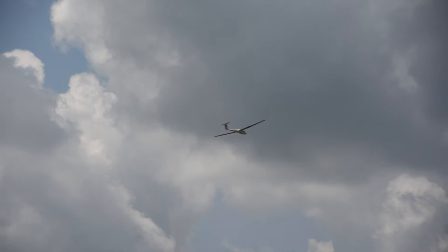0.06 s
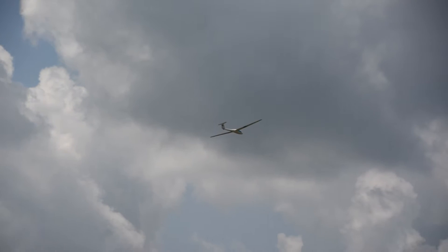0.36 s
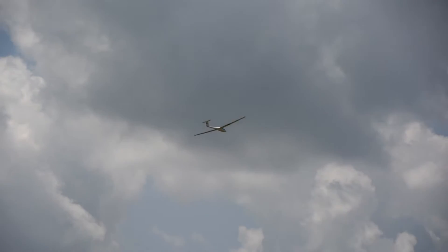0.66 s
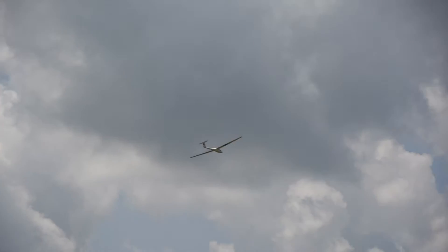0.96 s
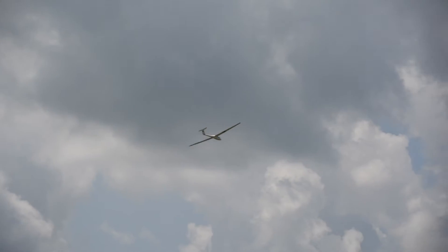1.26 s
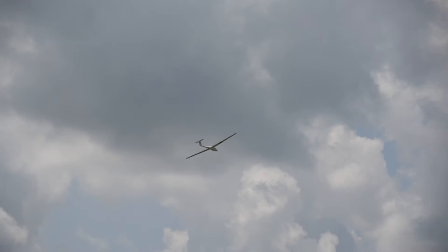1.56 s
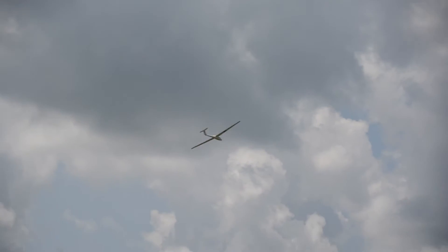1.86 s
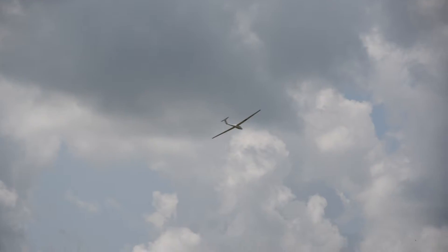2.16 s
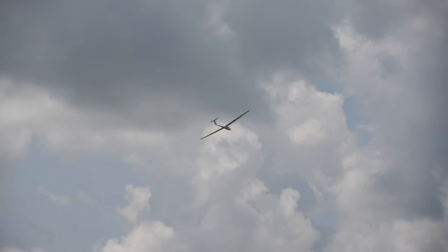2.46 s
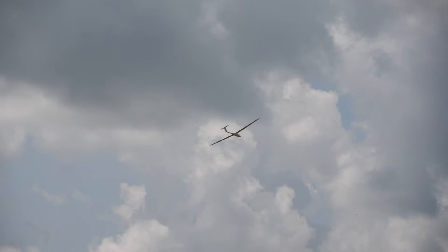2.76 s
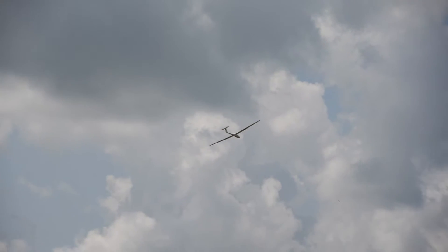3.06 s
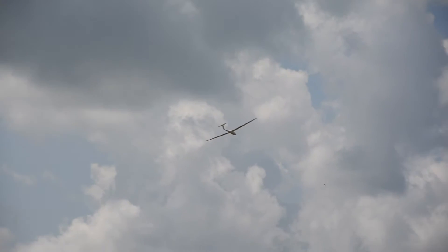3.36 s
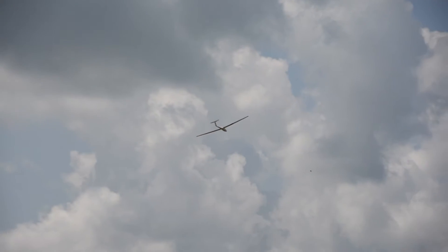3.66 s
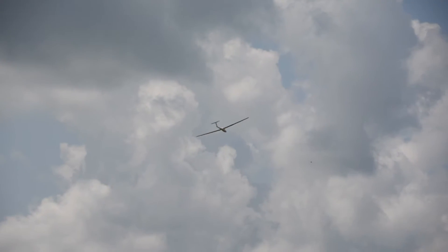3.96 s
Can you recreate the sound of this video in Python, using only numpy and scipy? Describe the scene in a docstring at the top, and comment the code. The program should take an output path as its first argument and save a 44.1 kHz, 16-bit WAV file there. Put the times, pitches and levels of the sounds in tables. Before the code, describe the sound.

Wind buffets the microphone outdoors for the whole four seconds, a low, fluttering rumble that surges and dips unevenly between left and right. Short bumps come throughout, with the hardest ones crackling at about 1.2, 1.5, 1.8 and 3.8 seconds, mostly on the left. Far behind lies a faint airy hiss, with a few barely audible thin chirps in the first second and a half.

```python
"""Gusty wind buffeting the two ports of a camera microphone, out under an open sky.
Each port has its own turbulence, right at the capsule: a steady rumble, and eddies that grow
harder and brighter in the gusts. The hardest buffets overload the recorder and crackle.
A faint airy hiss and a few thin chirps lie far behind."""
import sys
import numpy as np
from scipy import signal
from scipy.io import wavfile
from scipy.ndimage import uniform_filter1d

SR = 44100
rng = np.random.default_rng(int(sys.argv[2]) if len(sys.argv) > 2 else 0)


def master_out(mix):
    """Clip the mix to full scale and print it as 16-bit PCM to the path in sys.argv[1]."""
    frames = np.transpose(np.atleast_2d(mix))
    ceiling = np.clip(frames, -1, 1)
    pcm = np.round(ceiling * 32767).astype(np.int16)
    wavfile.write(sys.argv[1], SR, pcm)


N = 176400
PATCHY_PER_S = 8.2   # how fast each noise band wanders in level


def from_db(db):
    """Decibels to gain."""
    return 10 ** (np.asarray(db) / 20)


def rms_one(x):
    """Scale to unit power."""
    return x / np.sqrt(np.mean(x ** 2) + 1e-20)


def in_time(rows):
    """Read rows of time_s, value at every sample."""
    return np.interp(np.arange(N) / SR, *np.transpose(rows))


def at_hz(points, hz):
    """Read a table on a log-frequency axis."""
    freqs, values = np.transpose(points)
    return np.interp(np.log(hz), np.log(freqs), values)


def drift(per_s):
    """Smooth random motion with a spread of 1."""
    pole = np.exp(-40 * np.pi * per_s / SR)
    slow = signal.lfilter([1], [1, -2 * pole, pole * pole], rng.standard_normal(N // 20 + 4002))[4000:]
    return np.interp(np.arange(N) / 20, np.arange(len(slow)), rms_one(slow))


def band_noise(low, high):
    """Steep-sided band of noise with unit power, wide enough to meet its neighbours."""
    skirt = (high - low) / 8
    sos = signal.butter(2, [low - skirt, high + skirt], "band", fs=SR, output="sos")
    white = rng.standard_normal(N + SR // 4)
    return rms_one(signal.sosfilt(sos, signal.sosfilt(sos, white))[-N:])


def bands(spectrum, edges):
    """Share unit power by a spectrum: rows of low_hz, high_hz, centre_hz, gain."""
    hz = np.sqrt(edges[:-1] * edges[1:])
    gain = from_db(at_hz(spectrum, hz)) * np.sqrt(np.diff(edges))
    return zip(edges[:-1], edges[1:], hz, gain / np.linalg.norm(gain))


def chirps(wobble_hz=12):
    """Short, thin, slightly unsteady notes far behind the wind."""
    # faint whistles and chirps: centre_s, half_length_s, pitch_hz, level_db
    notes = [(.21, .025, 1846, -46), (.63, .16, 1460, -48), (.6, .035, 5841, -52.5),
             (.635, .03, 6681, -53.5), (1.28, .035, 9400, -61)]
    t = np.arange(N) / SR
    out = 0
    for centre_s, half_s, hz, db in notes:
        phase = 2 * np.pi * np.cumsum(hz + wobble_hz * drift(per_s=12)) / SR
        out += from_db(db) * np.exp(-((t - centre_s) / half_s) ** 2) * np.sin(phase)
    return out


def hiss(level_db=-41.5, patchy_db=1.3, flicker_db=1.2):
    """Airy, flickering background with a few narrow bands; it reaches the left port a sample later."""
    # colour of the hiss: freq_hz, density_db
    spectrum = [(1000, 11.5), (1900, 7.5), (2400, 3.5), (3600, -1.5), (4300, -4.5), (6700, -6.5),
                (10000, -12), (12500, -21), (15500, -37)]
    # how alike the two ports hear it: freq_hz, correlation
    likeness = [(1000, 0.28), (2500, 1), (4500, 0.8), (7000, 0.9), (11000, 0.21), (15000, .2)]
    # faint singing bands: centre_hz, width_hz, level_db
    narrow_bands = [(1454, 110, -49.5), (1914, 224, -47.5), (6640, 270, -69.5)]
    # slow rise and fall of the hiss: time_s, level_db
    swell = [(0, -3), (.28, -2.2), (.44, 3), (.54, -1.5), (.7, -0.8), (.94, -2.5), (1.2, -1.5), (1.38, 0.5),
             (1.72, -1.5), (2.2, -2), (2.46, 1), (2.58, -2), (2.7, -1), (3.25, -1.5), (3.8, 0.5),
             (3.91, 1.5), (4, 1)]
    air = 0
    for low, high, hz, gain in bands(spectrum, np.geomspace(1000, 16000, 15)):
        alike = at_hz(likeness, hz)
        mid = np.sqrt((1 + alike) / 2) * band_noise(low, high)
        side = np.sqrt((1 - alike) / 2) * band_noise(low, high) * np.array([[1], [-1]])
        air += gain * from_db(patchy_db * drift(PATCHY_PER_S)) * (mid + side)
    singing = sum(band_noise(hz - width / 2, hz + width / 2) * from_db(db)
                  for hz, width, db in narrow_bands)
    envelope = from_db(in_time(swell) + flicker_db * drift(per_s=18))
    left, right = envelope * (from_db(level_db) * air + singing)
    return np.array([np.roll(left, 1), right])


def turbulence(gust, level_db, flutter_db, flutter_per_s=63, body_hz=330, patchy_db=0.5):
    """Pressure at one port: gusts and passing eddies swell the upper bands far more than the rumble."""
    # turbulence at mean gust strength: freq_hz, density_db
    spectrum = [(25, -27.5), (50, -25), (90, -12.5), (160, -1.5), (280, 1), (420, -0.5), (650, -7.5),
                (900, -17), (1300, -29.5), (2000, -46), (3000, -56.5)]
    # how much of the gust's swing each band follows: freq_hz, share
    follows = [(60, 0.021), (250, 0.23), (500, 0.59), (900, 0.74), (1500, 1)]
    # body of the rumble, around body_hz: time_s, level_db
    body = [(0.1, 0.5), (1.7, -1.5), (2.4, 0.4), (4, 1.6)]
    force_db = in_time(gust) + flutter_db * 2 * np.tanh(drift(flutter_per_s) / 2)
    out = 0
    for low, high, hz, gain in bands(spectrum, np.geomspace(20, 3200, 23)):
        body_db = in_time(body) * np.exp(-np.log2(hz / body_hz) ** 2)
        swell_db = at_hz(follows, hz) * force_db + body_db
        out += gain * band_noise(low, high) * from_db(swell_db + patchy_db * drift(PATCHY_PER_S))
    return from_db(level_db) * out


def swing(centre_s, hz, skew=0.17, width_cycles=0.33):
    """One steep swing of pressure that starts slowly and snaps back faster: samples, window, wave."""
    near = np.arange(max(int((centre_s - .01) * SR), 0), min(int((centre_s + .01) * SR), N))
    cycles = (near / SR - centre_s) * hz
    cycles *= 1 + skew * np.tanh(2 * cycles)
    window = np.exp(-.5 * (cycles / width_cycles) ** 2)
    return near, window, np.sin(2 * np.pi * cycles)


def eddies(gust, level_db, per_s=85, count=700):
    """Small eddies hit a port at uneven intervals, harder and higher in pitch in the gusts."""
    pitch_hz, spread_octaves, octaves_per_db = 564, 0.27, 0.0584
    gust_share, spread_db = 0.59, 2.0
    times = np.cumsum(rng.gamma(2, .5, count)) / per_s
    scatter = np.clip(rng.standard_normal((count, 3)), -2, 2)
    out = np.zeros(N)
    for centre_s, (size, pitch, sign) in zip(times[times < N / SR], scatter):
        gust_db = np.interp(centre_s, *np.transpose(gust))
        hz = pitch_hz * 2 ** (spread_octaves * pitch + octaves_per_db * gust_db)
        strength = from_db(level_db + gust_share * gust_db + spread_db * size)
        near, window, wave = swing(centre_s, hz)
        out[near] += np.sign(sign) * strength * window * wave
    return out


def level_off(flow, ceiling_db=-1.2, window_s=0.0033):
    """The strength of ordinary turbulence is bounded, so a strong gust is a dense roar."""
    weights = signal.windows.hann(int(2 * window_s * SR))
    power = np.array([signal.fftconvolve(port ** 2, weights / weights.sum(), "same") for port in flow])
    return flow / np.sqrt(np.hypot(1, power / from_db(ceiling_db) ** 2))


def buffets(flow):
    """A big eddy displaces the flow at one port for a moment."""
    # hard buffets: centre_s, level_db, pitch_hz, port (0 left, 1 right)
    blows = [(0.0313,5,675,0), (0.076,4,690,0), (0.2932,4.5,760,0), (0.3684,8.5,584,0), (0.3875,6.5,600,0),
             (.432,6,600,0), (0.6713,4.5,686,0), (.763,6,590,0), (.935,5,670,0), (0.9739,5.5,630,0),
             (0.998,8,590,0), (1.0358,9,745,0), (1.114,0,790,0), (1.145,5,725,0), (1.1743,15,574,0),
             (1.238,8.5,620,0), (1.4126,5,595,0), (1.4279,6,810,0), (1.4341,6.5,735,0), (1.448,5.5,477,0),
             (1.49,6,630,0), (1.5,12.5,574,0), (1.591,6.5,830,0), (1.638,3,766,0), (1.670,2.5,664,0),
             (1.7463,5.5,746,0), (1.773,1.5,860,0), (1.8229,10,583,0), (1.8367,7.5,805,0), (1.883,-2,597,1),
             (1.906,5.5,563,1), (1.9663,7,567,0), (2.024,4,740,1), (2.034,5.5,635,1), (2.06,4.5,700,1),
             (2.1912,4.5,645,1), (2.2083,5,554,0), (2.2276,6.5,543,0), (2.537,5,587,1), (2.792,5,720,0),
             (2.83,5,664,0), (2.876,4.5,650,0), (2.94,4,716,1), (3.328,1.5,680,1), (3.504,5,600,0),
             (3.6386,6,544,0), (3.7661,11.5,780,0), (3.936,8,685,0), (3.986,4.5,513,0)]
    out = flow.copy()
    for centre_s, db, hz, port in blows:
        near, window, wave = swing(centre_s, hz)
        pressure = from_db(db) * rng.choice([-1, 1]) * wave
        out[port, near] += window * (pressure - out[port, near])
    return out


def wind():
    """Wind right on the microphone: each port takes its own gusts, eddies and buffets."""
    # gust strength at each port: time_s, level_db
    gust_left = [(0.0, -1.5), (0.1, 2), (0.2, -21), (0.24, -11.5), (0.46, 7), (0.64, -23), (0.66, -2.5),
                 (0.74, 4.5), (0.8, -16), (0.88, 0.5), (1.3, 2.5), (1.36, -13), (1.419, 10), (2.121, -1.6),
                 (2.16, -23), (2.22, 0), (2.28, -9), (2.32, -7), (2.48, -1.5), (2.68, -20), (2.74, 0.5),
                 (2.82, 5.5), (3.04, -8), (3.14, 8), (3.22, -9), (3.42, 2), (3.62, -11), (3.76, 3.5),
                 (3.86, -20), (4.0, 6.5)]
    gust_right = [(0.0, -5), (0.08, 3.3), (0.12, -12), (0.28, -20.5), (0.34, -5), (0.4, -23), (0.48, 1),
                  (0.76, -8), (0.82, 7), (0.9, -9.5), (1.0, 0.5), (1.42, 5), (1.48, -7.9), (1.56, 7),
                  (1.7, -3.5), (2.04, 6.5), (2.42, 1.3), (2.7, 5), (2.86, -2.5), (2.94, 4.5), (3.18, -3.5),
                  (3.22, 4.5), (3.54, -2), (3.62, 7.5), (3.84, -4), (4.0, 6.5)]
    # turbulence level, depth of its flutter and eddy level, each: left_db, right_db
    turbulence_db = [-11.5, -11.5]
    flutter_db = [12.5, 7]
    eddy_db = [-4.5, -6]
    flow = [turbulence(gust, turbulence_db[port], flutter_db[port]) + eddies(gust, eddy_db[port])
            for port, gust in enumerate((gust_left, gust_right))]
    return buffets(level_off(np.array(flow)))


def gain_control(x, target_db=-7, share=0.54, attack_s=0.0075, release_db_per_s=44.5):
    """The recorder's one gain for both channels: it ducks quickly after a blow and creeps back."""
    power = uniform_filter1d(np.max(x ** 2, axis=0), size=300)
    level_db = 10 * np.log10(np.maximum(power, 1e-6))
    ramp = release_db_per_s * np.arange(N) / SR
    held_db = np.maximum.accumulate(level_db + ramp) - ramp   # holds each peak, then falls steadily
    pole = np.exp(-1 / (attack_s * SR))
    excess_db = signal.lfilter([1 - pole], [1, -pole], held_db - target_db)
    return x * from_db(-share * excess_db)


def scene():
    """Wind on both ports, with the hiss and the chirps far behind."""
    return wind() + hiss() + chirps()


def record(dry, low_cut_hz=50.5, knee=50, stopband_hz=16900):
    """The recorder: low cut, gain control, peaks that slip past flatten at full scale, top cut."""
    low_cut = signal.butter(2, low_cut_hz, "high", fs=SR, output="sos")
    top_cut = signal.cheby2(12, 60, stopband_hz, fs=SR, output="sos")
    levelled = gain_control(signal.sosfilt(low_cut, dry))
    clipped = levelled / (1 + np.abs(levelled) ** knee) ** (1 / knee)
    return signal.sosfilt(top_cut, clipped)


dry = scene()
out = record(dry)
master_out(out)
```